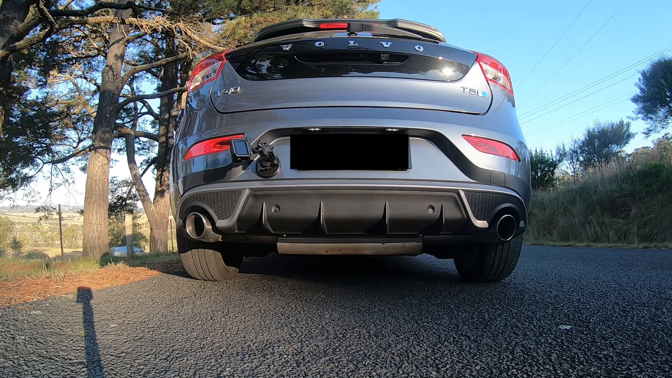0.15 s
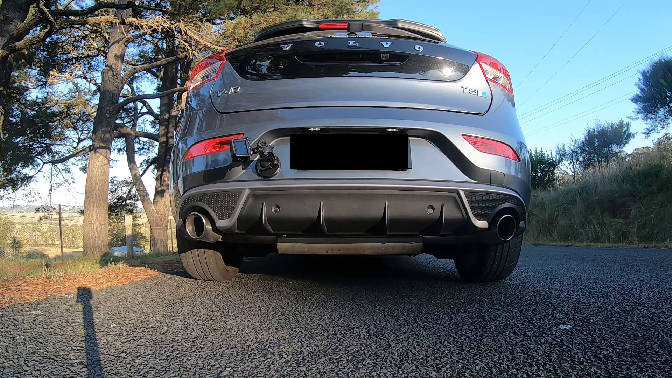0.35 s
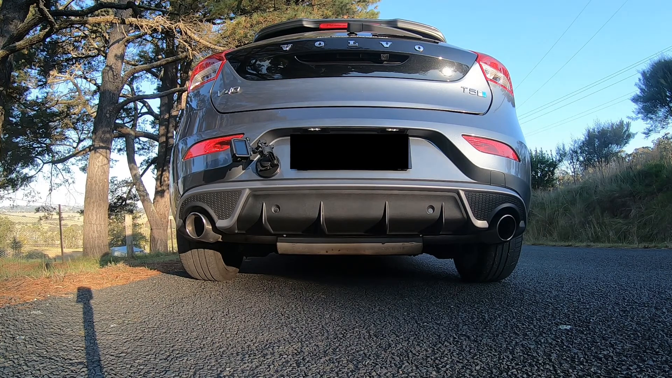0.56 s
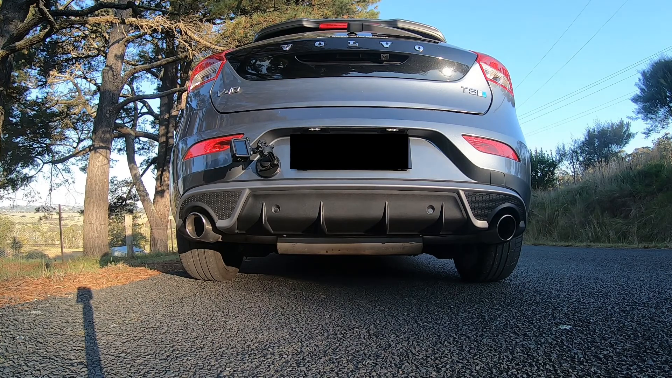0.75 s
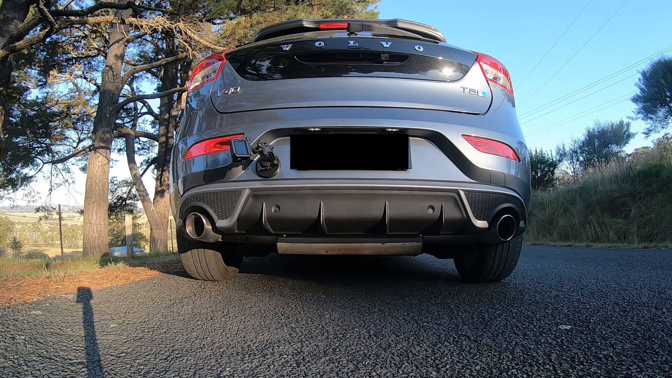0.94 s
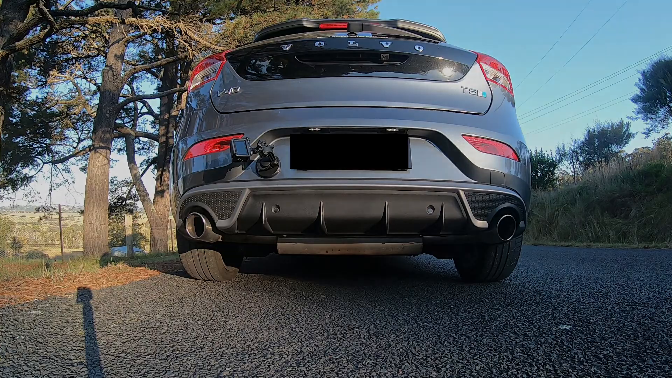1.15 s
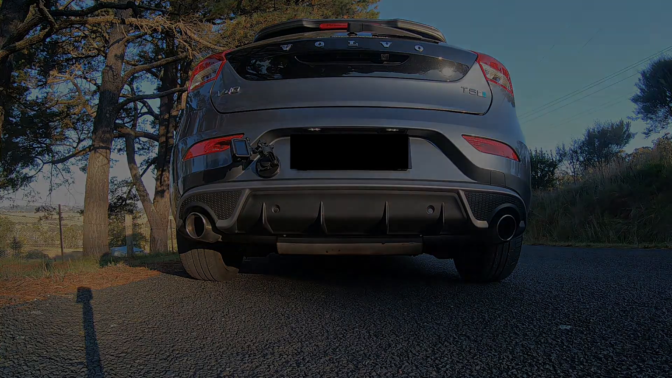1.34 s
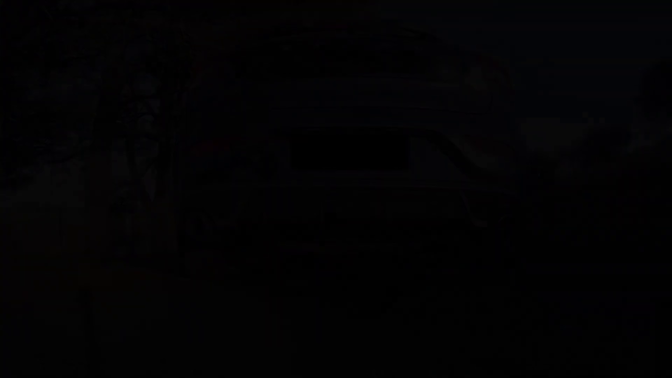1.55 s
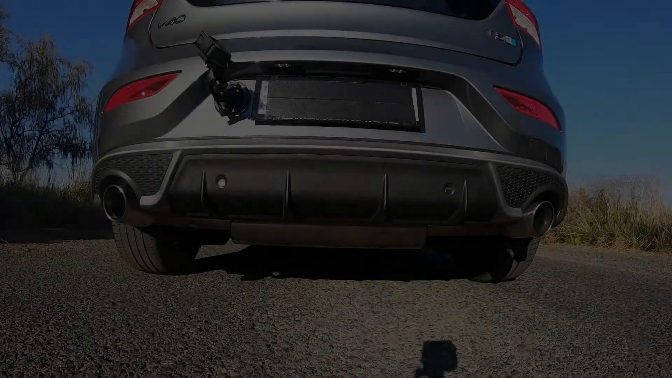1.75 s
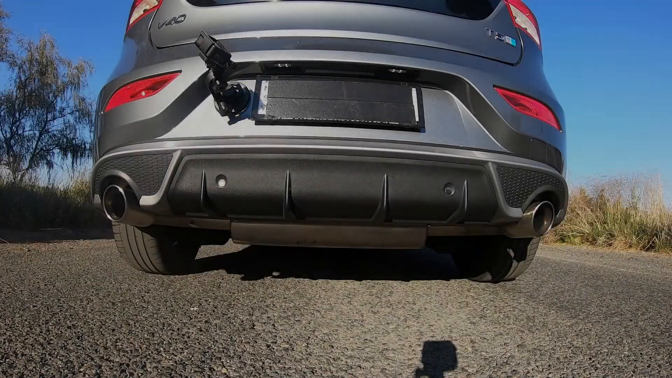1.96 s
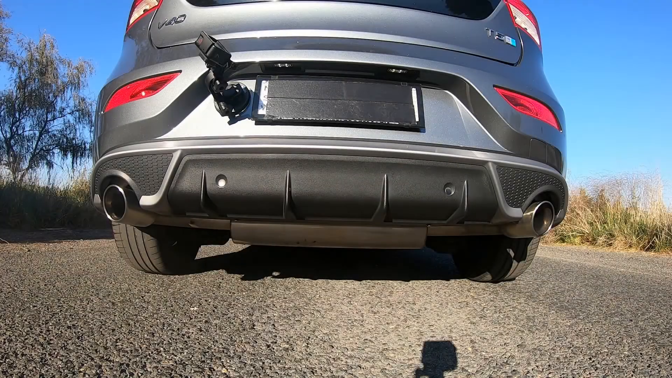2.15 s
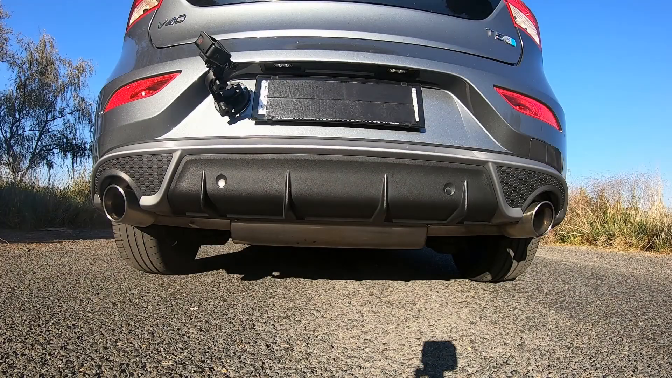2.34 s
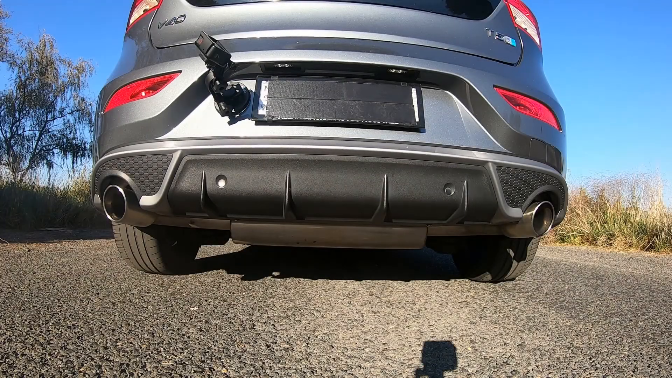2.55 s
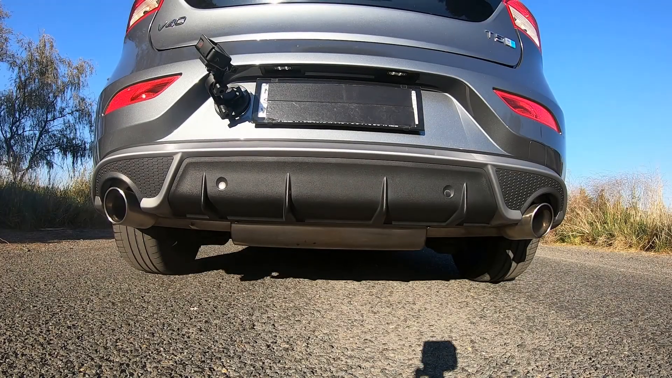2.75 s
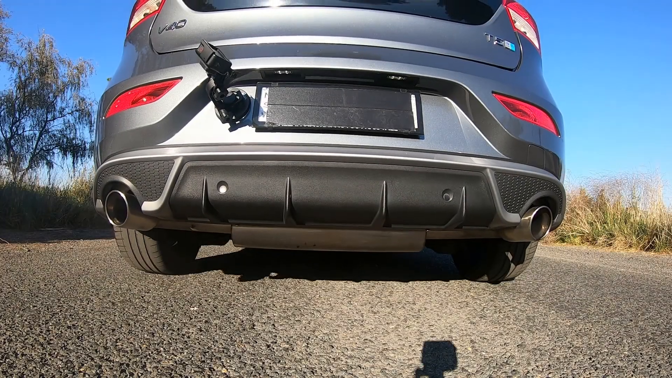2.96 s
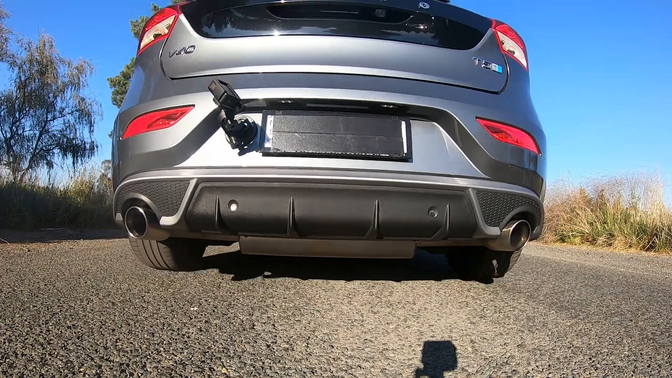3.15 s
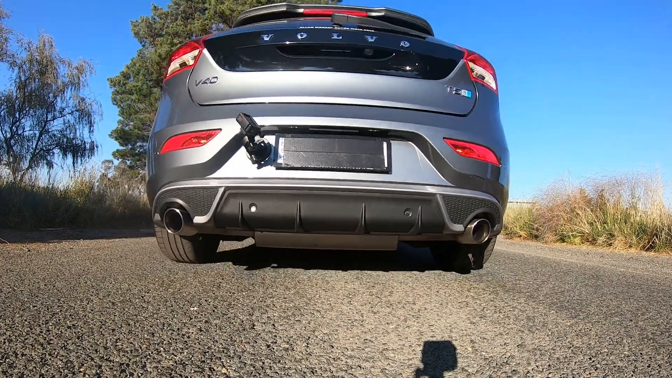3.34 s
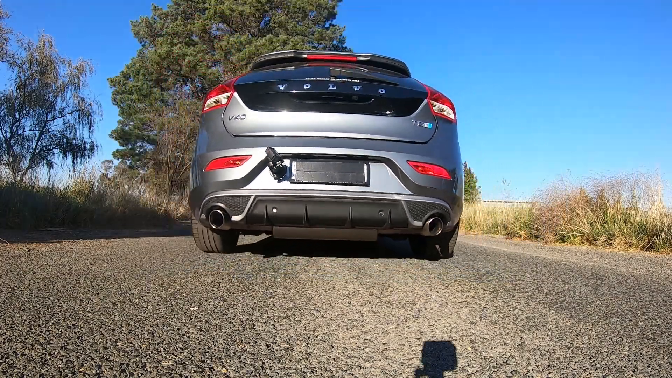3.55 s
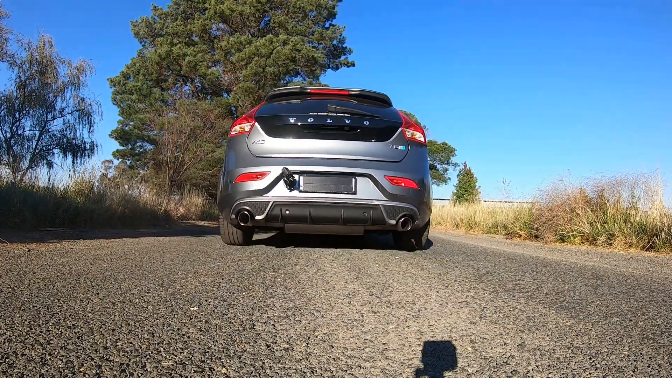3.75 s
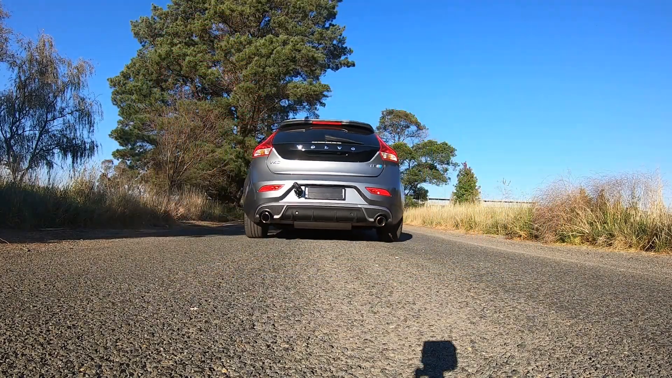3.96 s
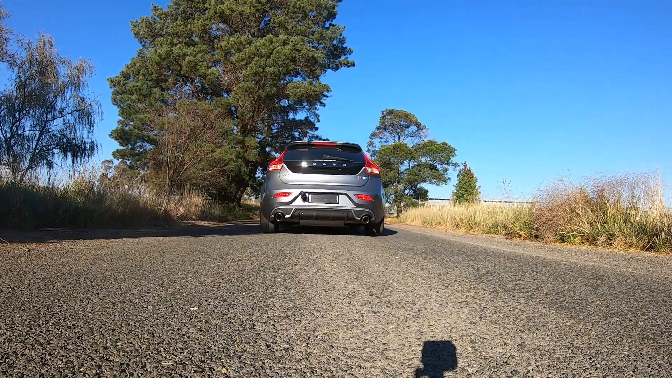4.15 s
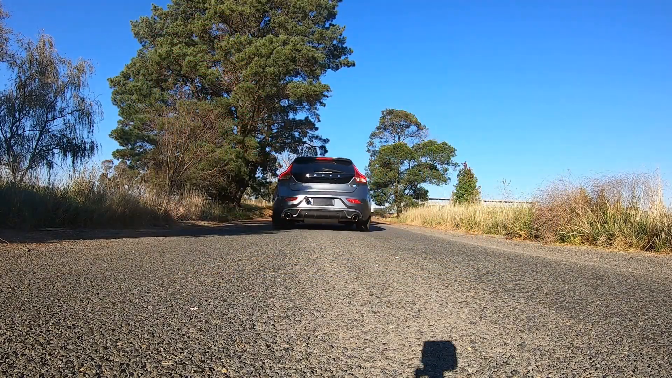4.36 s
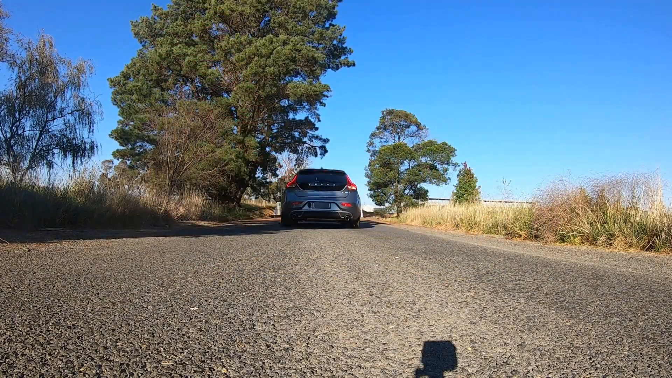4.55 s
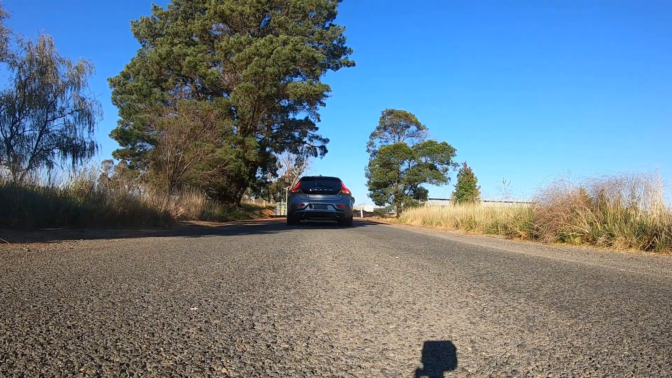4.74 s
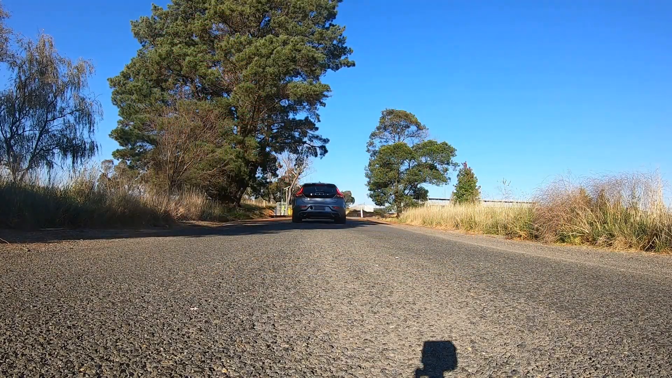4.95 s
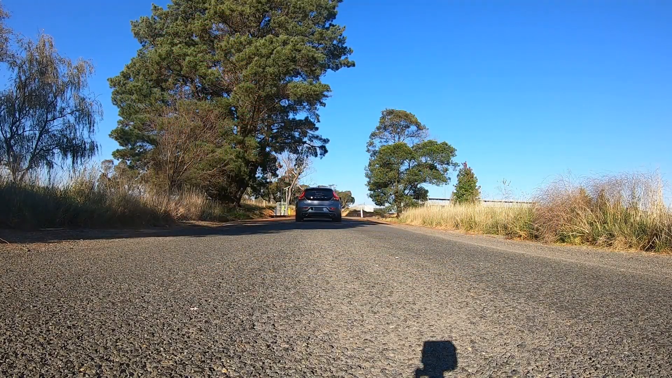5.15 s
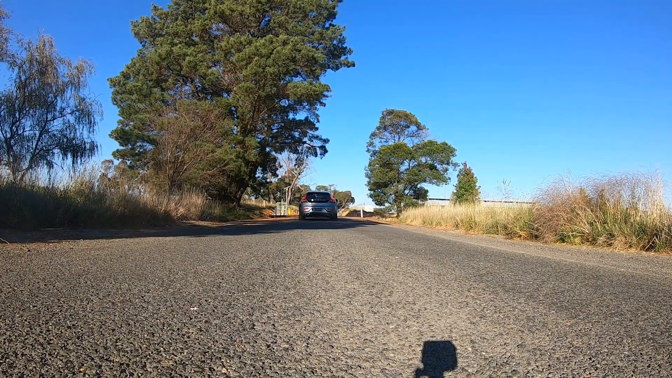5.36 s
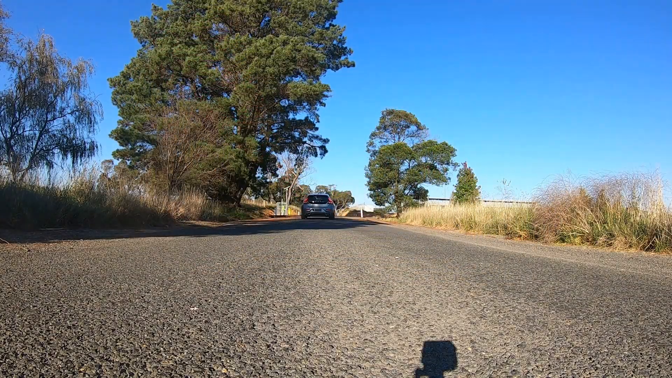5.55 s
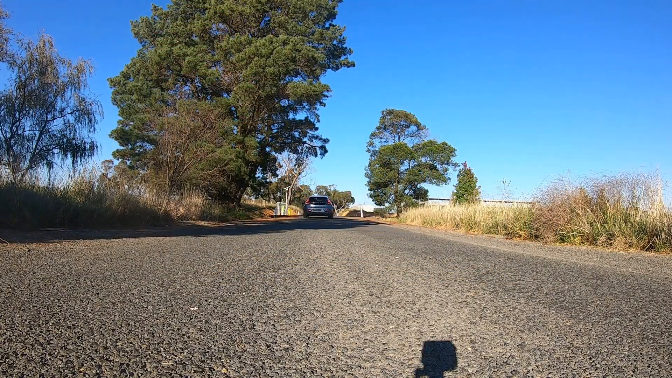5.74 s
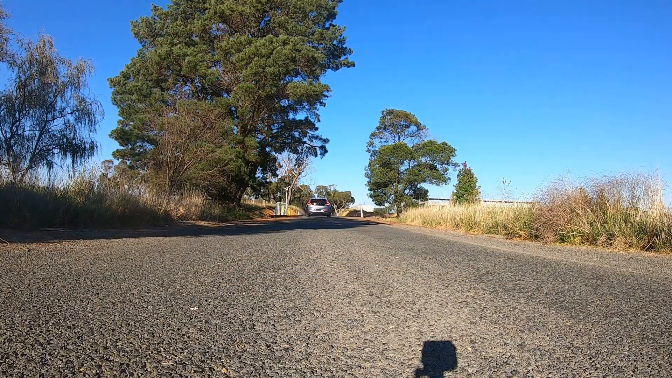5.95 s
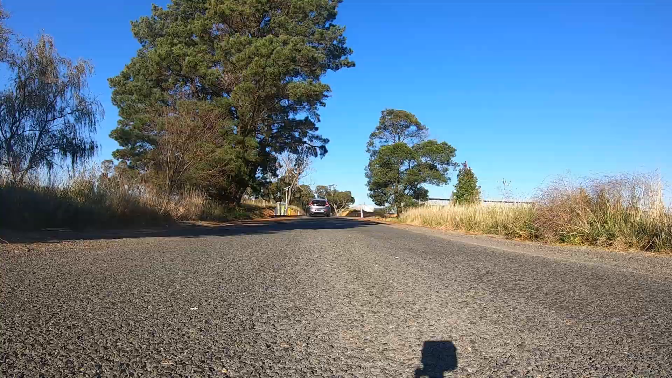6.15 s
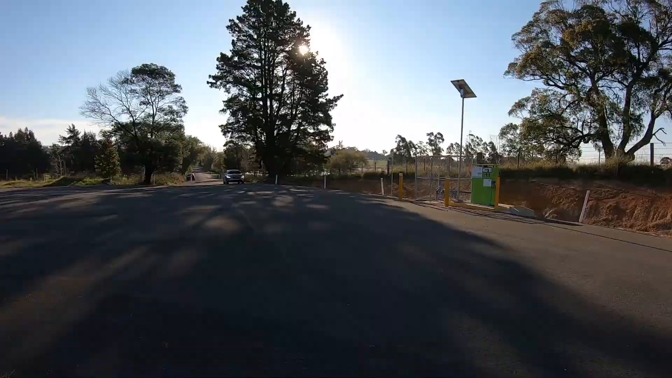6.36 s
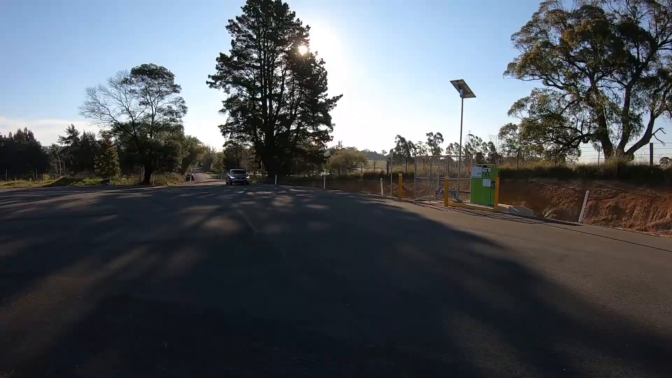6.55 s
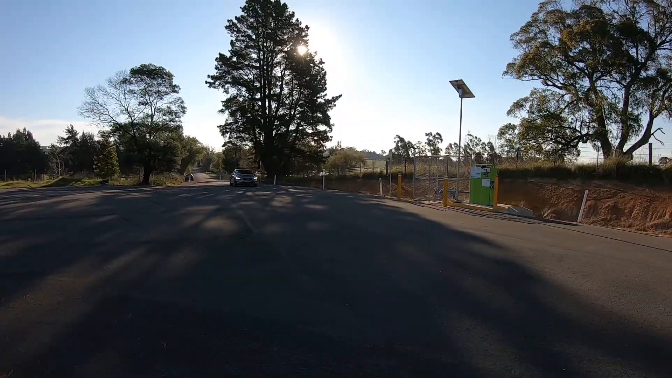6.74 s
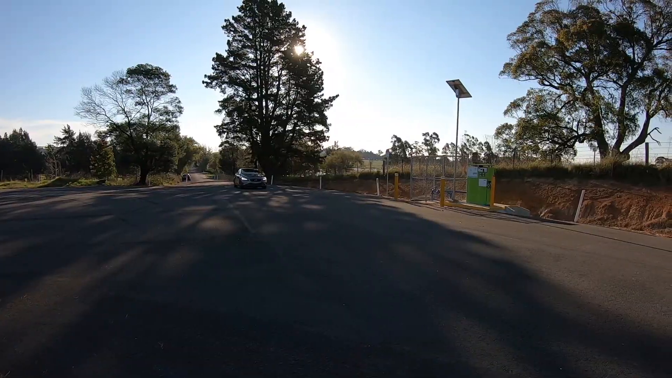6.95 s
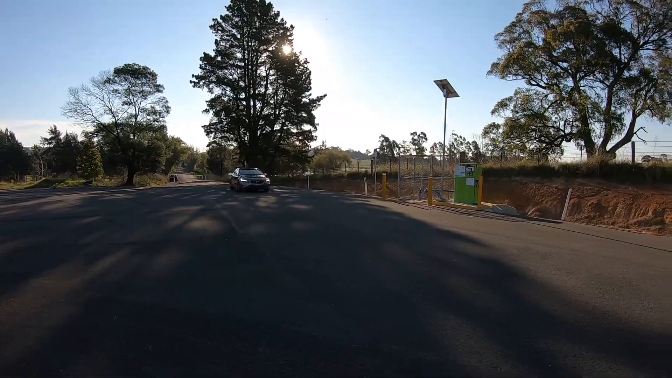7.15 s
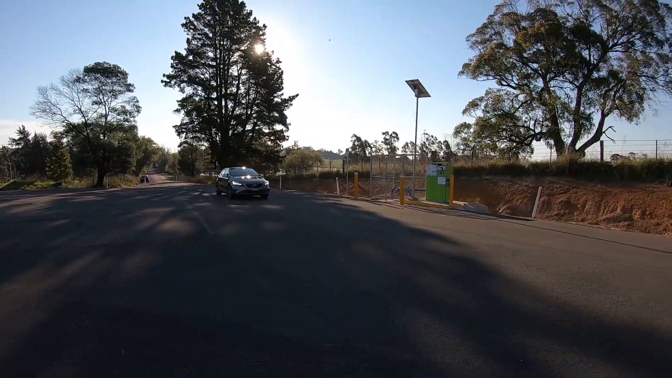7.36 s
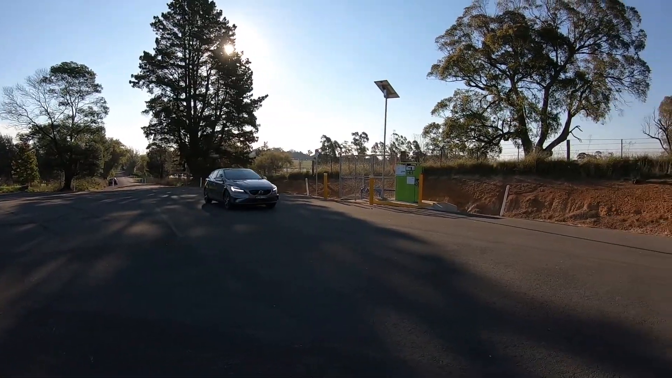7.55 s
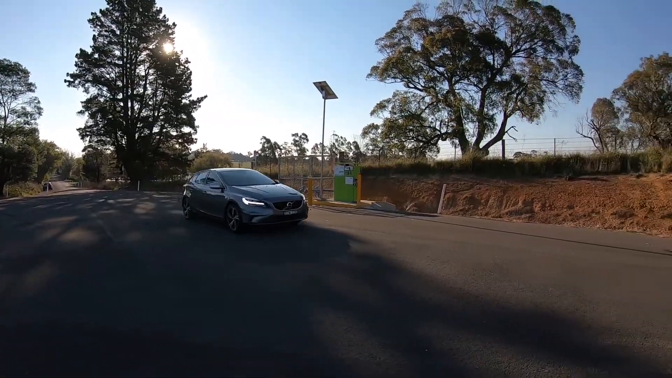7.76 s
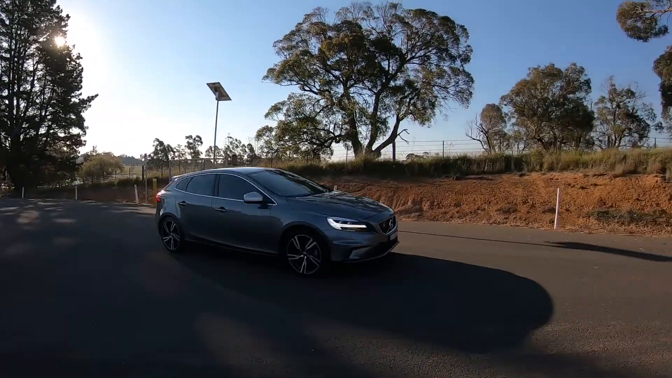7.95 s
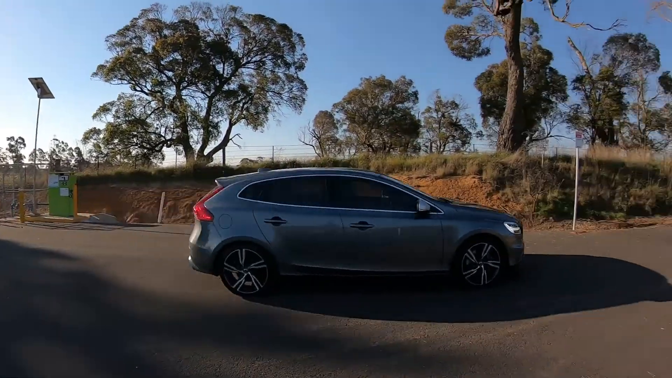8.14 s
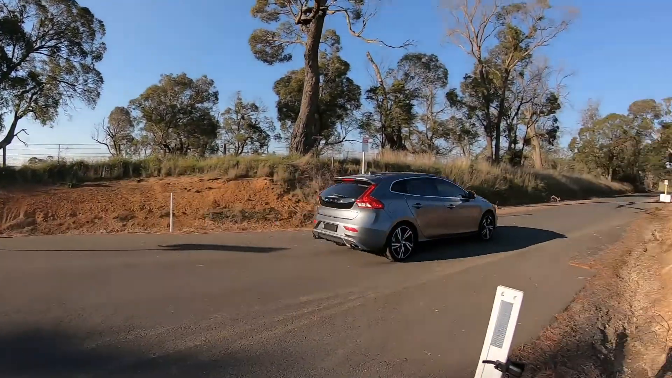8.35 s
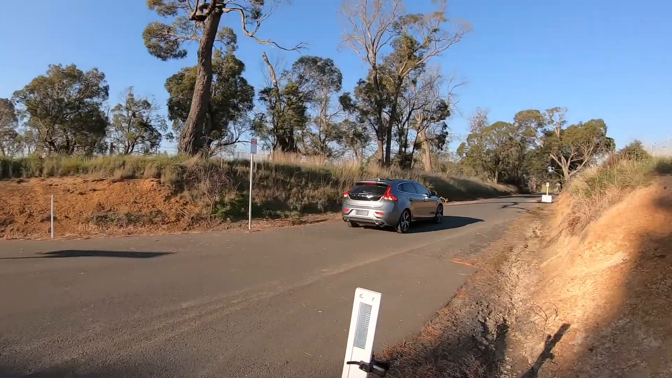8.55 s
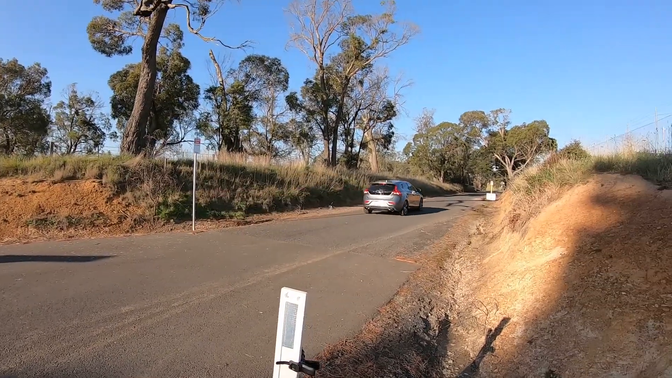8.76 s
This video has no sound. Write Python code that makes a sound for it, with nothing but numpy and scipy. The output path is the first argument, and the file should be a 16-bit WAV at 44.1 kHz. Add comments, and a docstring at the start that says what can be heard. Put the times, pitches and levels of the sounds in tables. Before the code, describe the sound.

A small car with a loud exhaust settles to a fading idle, launches hard over grit, burbles at a gear change, then roars past the roadside.

```python
"""A four-cylinder car with a loud exhaust, heard outdoors from changing places: the opening idle fades,
then comes the launch from behind over loose grit, burbling through a gear change, then the pass from
beside the road with tyre roar. The exhaust is a stack of tones locked to the firings. Gas, tyres and
rumble are shaped noise, grit is short noise bursts and ticks, and the idle whistles and soft swells
are noise in resonances. All but the ticks, whistles and swells differ between two microphone ports."""
import sys
import numpy as np
from scipy import signal
from scipy.io import wavfile
from scipy.ndimage import uniform_filter1d

SR = 44100
rng = np.random.default_rng(int(sys.argv[2]) if len(sys.argv) > 2 else 0)


def generate_wav(signal):
    """Clip the signal to [-1, 1] and save it as 16-bit WAV at the path in sys.argv[1]."""
    frames = np.transpose(np.atleast_2d(signal))
    scaled = np.clip(frames, -1, 1) * 32767
    pcm = np.round(scaled).astype(np.int16)
    wavfile.write(sys.argv[1], SR, pcm)


N = 388080  # length in samples
MOVE_S = 6.34  # the launch ends and the pass begins


def gain_of(db):
    """Turns decibels into a factor."""
    return 10 ** (np.asarray(db) / 20)


def evened(x):
    """Scales a signal to rms 1."""
    return x / np.sqrt(np.mean(x ** 2) + 1e-20)


def read(points, hz):
    """Reads a table of values over pitch at the given frequencies."""
    f, value = np.transpose(points)
    return np.interp(np.log(hz + 1), np.log(f + 1), value)


def follow(rows, t):
    """Reads every column of a table over time at the given times."""
    s, *columns = np.transpose(rows)
    return [np.interp(t, s, c) for c in columns]


def add(mix, s, sound):
    """Mixes a sound in, starting at s seconds."""
    part = mix[..., round(s * SR):][..., :sound.shape[-1]]
    part += sound[..., :part.shape[-1]]


def resonate(x, hz, width):
    """Rings at one pitch, fixed or moving: shift that pitch down to zero, smooth, shift back up."""
    turn = np.exp(2j * np.pi * np.cumsum(hz * np.ones(len(x))) / SR)
    r = np.exp(-np.pi * width / SR)
    return 2 * (turn * signal.lfilter([1 - r], [1, -r], x / turn)).real


# How far the throttle is open: the two times in seconds between which it goes from shut to open.
THROTTLE_OPENS = (2.47, 2.8)


def throttle(t):
    """Engine load, from 0 with the throttle shut to 1 with it open."""
    return np.interp(t, THROTTLE_OPENS, [0, 1])


# Engine speed as heard. Each row: time in seconds, firings per second.
FIRING_RATE = [(0, 56.5), (.2, 50.4), (.4, 43.7), (.55, 38), (.63, 38.5), (1.1, 34.1), (1.5, 32.4),
               (2.1, 31.6), (2.45, 31.7), (2.53, 34.3), (2.62, 41.5), (2.72, 51.8), (2.82, 59),
               (2.95, 65.2), (3.2, 71.9), (3.45, 75.1), (3.7, 80.2), (3.9, 87.6), (4.3, 107.4),
               (4.7, 140.1), (5, 158.5), (5.45, 180.1), (5.8, 197), (5.97, 200.6), (6.2, 148.7),
               (6.339, 146.5), (6.34, 153.3), (7, 171.4), (7.2, 178.8), (7.6, 190.8), (7.8, 198.6),
               (8.16, 205.2), (8.27, 204.8), (8.36, 199.2), (8.45, 196.5), (8.8, 196.8)]
# The burble while three cylinders are cut for the gear change. Each row: time in seconds, level in dB.
BURBLE_LEVEL = [(6.03, -48), (6.05, -20.5), (6.12, -18), (6.19, -16.5), (6.24, -32)]
SHIFT_START_S, SHIFT_END_S = BURBLE_LEVEL[0][0], BURBLE_LEVEL[-1][0]
# Spread of firing strength: steady part, part per firing rate in Hz, part added in the shift, and passing
ROUGH_IDLE, ROUGH_PER_HZ, ROUGH_SHIFT, ROUGH_PASS = 0.022, 0.00032, 0.89, 0.24


def exhaust(t, rows, mufflers, multiples, half_db):
    """Tones at multiples of the firing rate, shaped by the pipe; no two firings are equally strong."""
    hz, = follow(FIRING_RATE, t)
    level_db, extra_db = follow(rows, t)
    load = throttle(t)

    def pipe_db(f):
        return (1 - load) * read(mufflers[0], f) + load * read(mufflers[1], f)

    tone_db = [level_db + db + share * extra_db + pipe_db((k + 1) * hz)
               for k, (db, share) in enumerate(multiples)]

    # Misfires make the firings more uneven during the shift
    shifting = uniform_filter1d(1. * (t > SHIFT_START_S) * (t < SHIFT_END_S), size=3000)
    rough = np.where(t < MOVE_S, ROUGH_IDLE + ROUGH_PER_HZ * hz + ROUGH_SHIFT * shifting, ROUGH_PASS)

    turns = np.cumsum(hz) / SR  # firings so far
    strength = rng.standard_normal((int(turns[-1]) + 2, 3))
    low, high, slow = (np.interp(turns, np.arange(len(strength)), s) for s in strength.T)

    def wave(k, db):
        lag = np.pi / 4 * (1 - (k - 1) * (k - 2) / 2)  # the muffler holds the bass back
        return np.sqrt(2) * gain_of(db) * np.cos(2 * np.pi * k * turns - lag)

    lower = sum(wave(k + 1, db) for k, db in enumerate(tone_db[:2]))
    upper = sum(wave(k + 3, db) for k, db in enumerate(tone_db[2:]))
    # Every second firing is weaker, more or less so over time: tones half-way between the multiples
    halves = sum(wave(k + 1.5, np.maximum(tone_db[k], tone_db[k + 1]) + db)
                 for k, db in enumerate(half_db))
    wander = 1 + evened(uniform_filter1d(slow, size=6000)) / 2
    tones = (1 + rough * low) * lower + (1 + rough * high) * upper + wander * halves
    return tones, turns, hz


# Resonances of the pipe. Each row: pitch in Hz, width in Hz, relative level in dB.
PIPE_RESONANCES = [(46.5, 24, 24), (94, 50, -14), (150, 60, -29), (360, 50, -24)]


def burble(t, hz):
    """One cylinder in four still fires and thumps the pipe, which rings."""
    on = (t > SHIFT_START_S) & (t < SHIFT_END_S)
    cycles = np.cumsum(hz * on) / SR / 4 + 0.06
    thumps = -np.diff(np.floor(cycles), prepend=0)
    thumps = thumps * (1 + 0.17 * rng.standard_normal(len(t)))
    thumps = signal.oaconvolve(thumps, signal.windows.hann(90), "same")  # a blunt pressure pulse
    rung = sum(gain_of(db) * resonate(thumps, f, w) / w for f, w, db in PIPE_RESONANCES)
    level_db, = follow(BURBLE_LEVEL, t)
    return gain_of(level_db) * on * rung / np.sqrt(np.mean(rung[on] ** 2))


# How far the left port runs ahead of the right. Each row: pitch in Hz, phase in radians.
LEFT_LEAD = [(600, 0.17), (950, 0.84), (2000, 0.66), (3300, 0.33), (4300, 0.22)]


def noise(t, spectrum, ports, patchy_db, tilt_db=0):
    """Noise with a patchy random spectrum as the two ports hear it; tilt turns about 1.5 kHz."""
    frames, hz = len(t) // 256 + 5, np.fft.rfftfreq(1024, 1 / SR)
    a, b, c, d, patches = rng.standard_normal((frames, 513, 5)).T
    patches = uniform_filter1d(patches, size=9, axis=0)  # along pitch
    patches = evened(uniform_filter1d(patches, size=10, axis=1))  # along time

    same, balance_db, lead = (read(p, hz)[:, None] for p in (*ports, LEFT_LEAD))
    same = np.clip(same, 0, 1)
    left = a + 1j * b
    right = same * left + np.sqrt(1 - same ** 2) * (c + 1j * d)
    right = right * np.exp(-1j * lead)
    pair = np.array([left * gain_of(balance_db / 2), right / gain_of(balance_db / 2)])

    shape = gain_of(read(spectrum, hz)[:, None] + patchy_db * patches)
    shape = shape / np.sqrt(np.mean(shape ** 2))
    tilt_db = np.interp(np.arange(frames) * 256, np.arange(len(t)), tilt_db * np.ones(len(t)))
    octaves = np.log2(np.maximum(hz, 300) / 1500)[:, None]
    pair *= shape * gain_of(tilt_db * octaves)
    return signal.istft(pair, nperseg=1024, noverlap=768)[1][:, :len(t)] / 26


def hiss(t, calm, loaded, ports, patchy_db, tilt_db, turns, puff):
    """Rushing noise that blends from calm to loaded; gas leaves the pipe in puffs, one a firing."""
    load = throttle(t)
    shut = (1 - load) * noise(t, calm, ports, patchy_db, tilt_db)
    opened = load * noise(t, loaded, ports, patchy_db, tilt_db)
    puffs = evened(gain_of(puff * np.cos(2 * np.pi * turns)))
    return (shut + opened) * puffs


# Colour of the low rumble. Each row: pitch in Hz, relative level in dB per Hz.
RUMBLE_COLOUR = [(20, -33.5), (45, -16.5), (95, 6), (150, -2), (250, -3), (370, -6), (460, -9.5),
                 (800, -59)]


def rumble(t, ports, gain):
    """Deep noise that follows a given loudness."""
    return gain * noise(t, RUMBLE_COLOUR, ports, patchy_db=2.0)


def car(span, rows, mufflers, multiples, rush, calm, loaded, ports, half_db, puff, patchy_db):
    """Sums exhaust, burble, hiss and rumble over a span of time."""
    t = np.arange(*span, 1 / SR)
    tones, turns, hz = exhaust(t, rows, mufflers, multiples, half_db)
    if t[0] < SHIFT_START_S < t[-1]:
        tones = tones + burble(t, hz)
    hiss_db, tilt_db, rumble_gain, pan_db = rush(t)
    pan_db = np.outer([.5, -.5], pan_db - pan_db.mean())  # left up, right down
    rushing = hiss(t, calm, loaded, ports, patchy_db, tilt_db, turns, puff) * gain_of(hiss_db + pan_db)
    deep = rumble(t, ports, rumble_gain)
    fade = np.minimum(1, abs(t - MOVE_S) / .004)  # a short fade where launch and pass meet
    return (tones * gain_of([[-.4], [.4]]) + rushing + deep) * fade


# The rush before the pass. Each row: time in seconds, hiss in dB before the tilt,
# extra brightness in dB per octave.
RUSH_AWAY = [(0, -42.5, -0.5), (0.6, -48, -0.5), (1.9, -47.5, 0.5), (2.45, -43, 1), (2.65, -37, 1.5),
             (3.4, -33.5, 0.9), (4.1, -34.5, 1), (4.65, -30, -0.5), (5.6, -31.5, -0.6), (6.34, -32.5, -1.3)]
RUMBLE_OVER_HISS_DB, PAN_DRIFT_DB_PER_S = 5, 0.4


def rush_behind(t):
    """Hiss, brightness, rumble and pan up to the pass; the rumble keeps step with the hiss."""
    hiss_db, tilt_db = follow(RUSH_AWAY, t)
    return hiss_db, tilt_db, gain_of(hiss_db + RUMBLE_OVER_HISS_DB), PAN_DRIFT_DB_PER_S * t


# Exhaust at idle and launch. Each row: time in seconds, level in dB before the tables below,
# extra dB for the favoured multiples.
LAUNCH_LEVEL = [(0, -21, -1.5), (0.55, -20.5, -7), (0.63, -29.5, -5), (1.1, -28.5, -2), (1.35, -33.5, -2),
                (1.5, -32, -0.5), (2.1, -49, 13), (2.45, -47.5, 11.5), (2.53, -41, 9), (2.62, -26.5, 0.5),
                (2.72, -30, 0.7), (3.2, -28, 1), (3.7, -29.5, 3.5), (4.4, -22, -0.2), (4.7, -24.5, 6),
                (5, -22.5, 3.3), (5.45, -24, 1.7), (5.97, -20, -5.5), (6.2, -39, 10)]
# How the pipe passes each pitch, throttle shut and then open. Each row: pitch in Hz, gain in dB.
PIPE_SHUT = [(30, 11.5), (45, 15.5), (65, 9.5), (90, 8.5), (120, -2), (160, -2), (200, -10.5), (280, -17),
             (450, -24)]
PIPE_OPEN = [(35, 14), (65, 15.3), (90, 10.5), (115, 1.5), (145, 6.3), (170, -3.3), (195, -8.5), (230, -5),
             (280, -6.5), (320, -8), (365, -2.5), (420, -17), (520, -27), (900, -21)]
# The 1st to 8th multiple of the firing rate. Each row: level in dB, share of the extra dB.
TONES_BEHIND = [(0.5, 0.5), (0.5, 1.5), (-2.5, 1), (-5, 2), (-7, 1.5), (-14, 1.5), (-11.5, 2), (-13, 2)]
# Gas hiss at idle, then exhaust and road under load. Each row: pitch in Hz, relative level in dB per Hz.
IDLE_COLOUR = [(180, -32), (300, -19), (343, -9), (399, -21), (500, -4), (749, -9), (871, -5.5),
               (1030, -10.5), (1590, -8), (2420, -15), (3310, -15.5), (4210, -22), (6220, -31), (8140, -27),
               (10800, -41.5), (14100, -75.5), (22000, -120)]
LOAD_COLOUR = [(260, -29.5), (450, -9), (542, -9), (746, -8), (808, -12.5), (936, -7.5), (1610, -15.5),
               (1770, -13), (2000, -19), (2280, -16.5), (3450, -19.5), (4270, -25.5), (6110, -35.5),
               (7870, -34), (10800, -48), (14100, -85.5), (22000, -120)]
# The two ports, as two lists. Each row: pitch in Hz, likeness (1 is equal); then pitch in Hz, left over
# right in dB.
PORTS_BEHIND = [(60, 0.5), (220, 0.83), (790, 0.9), (2860, 0.87), (10400, 0.1)], [(60, -9.5), (140, -3),
                (330, -0.5), (790, -6), (1860, -3.5), (4400, -1.5), (10400, 1)]


def idle_and_launch():
    """The opening idle fades, then the car pulls away as the throttle opens, with strong gas puffs."""
    return car((0, MOVE_S), LAUNCH_LEVEL, (PIPE_SHUT, PIPE_OPEN), TONES_BEHIND, rush_behind,
               IDLE_COLOUR, LOAD_COLOUR, PORTS_BEHIND,
               half_db=(-27, -29, -20, -17, -13.5), puff=0.87, patchy_db=1.26)


# The pass: a straight line at steady speed
CLOSEST_S, CLOSEST_M, SPEED_M_PER_S = 8.045, 4.03, 13.1
ROAR_DB = -13.5  # at the closest point, before the tilt
# Brightness in dB per octave: far off, added when near, added from the rear
BRIGHT_FAR_DB, BRIGHT_NEAR_DB, BRIGHT_REAR_DB = -2.5, 4.5, -1
RUMBLE_FRONT_DB, RUMBLE_REAR_DB = -9., 0.5  # against the roar
RUMBLE_FLOOR_DB, PAN_SWING_DB = -31., -4


def rush_beside(t):
    """The same from distance and bearing: bright when near, duller and deeper once the rear shows."""
    along = SPEED_M_PER_S * (t - CLOSEST_S)
    near = CLOSEST_M / np.hypot(along, CLOSEST_M)
    bearing = along * near / CLOSEST_M  # towards -1 approaching, towards 1 leaving
    rear = (1 + bearing) / 2
    hiss_db = ROAR_DB + 20 * np.log10(near)
    tilt_db = BRIGHT_FAR_DB + BRIGHT_NEAR_DB * near + BRIGHT_REAR_DB * rear ** 2
    rumble_db = hiss_db + RUMBLE_FRONT_DB + (RUMBLE_REAR_DB - RUMBLE_FRONT_DB) * rear
    rumble_gain = np.sqrt(gain_of(rumble_db) ** 2 + gain_of(RUMBLE_FLOOR_DB) ** 2)
    return hiss_db, tilt_db, rumble_gain, PAN_SWING_DB * bearing


# Exhaust from beside. Each row: time in seconds, level in dB before the two tables below,
# extra dB for the favoured multiples.
PASS_LEVEL = [(6.34, -38.5, 6.5), (6.8, -27, 8.5), (7.2, -24, -0.7), (7.55, -25, -8.5), (7.8, -22.5, -8),
              (7.95, -20, -11.5), (8.1, -22.0, 0), (8.17, -22.5, -4.5), (8.272, -27.5, 3),
              (8.36, -22, -5.5), (8.41, -25.5, 9), (8.56, -26.7, 10), (8.65, -24.5, -5.5),
              (8.8, -24.5, -1.5)]
# How the pipe passes each pitch, heard from beside. Each row: pitch in Hz, gain in dB.
PIPE_BESIDE = [(150, 13), (180, -6.5), (205, 3), (330, -19.5), (400, -6), (480, -10.5), (600, -1.5),
               (700, 0), (820, -6), (960, 14), (1080, -12), (1220, 3.5), (1400, 8), (1650, 18)]
# The 1st to 8th multiple of the firing rate. Each row: level in dB, share of the extra dB.
TONES_BESIDE = [(-1, -0.082), (6, 1), (-8, -0.48), (-13, -0.54), (-17.5, -0.023), (-19.5, -0.69),
                (-23, -0.59), (-30, 0)]
# Tyres passing. Each row: pitch in Hz, relative level in dB per Hz.
TYRE_COLOUR = [(260, -16), (450, -8.5), (514, -5), (595, -4), (841, -6.5), (987, -3.5), (1320, -6.5),
               (2220, -9.5), (3990, -15.5), (4380, -21), (9740, -32.5), (10800, -43), (12000, -54),
               (14100, -58), (15000, -95), (22000, -120)]
# The two ports, as two lists. Each row: pitch in Hz, likeness (1 is equal); then pitch in Hz, left over
# right in dB.
PORTS_BESIDE = [(60, 1), (220, 0.99), (790, 1), (2860, 0.97), (10400, 0.23)], [(60, -0.5), (140, -0.5),
                (330, -2.5), (790, -6.5), (1860, -1.5), (4400, 0), (10400, 0.5)]


def drive_past():
    """The car from beside the road: tyre roar swells and fades with distance, along with the exhaust."""
    return car((MOVE_S, N / SR), PASS_LEVEL, (PIPE_BESIDE, PIPE_BESIDE), TONES_BESIDE, rush_beside,
               TYRE_COLOUR, TYRE_COLOUR, PORTS_BESIDE,
               half_db=(-29, -22, -3, -12, -2.5), puff=0.15, patchy_db=1.4)


# Grit thrown by the tyres. Each row: start in seconds, peak in dB, main pitch in Hz.
GRIT_HITS = [(3.3606, -20, 1230), (3.3787, -21, 1110), (3.435, -16.5, 2040), (3.451, -15, 1200),
             (3.4626, -24, 1300), (3.552, -17, 1100), (3.5656, -23, 2200), (3.6485, -25, 1500),
             (3.723, -22, 1300), (3.7288, -18, 2830), (4.695, -20.5, 2250), (8.3683, -9, 1690)]


def grit():
    """Short noise bursts around a pitch, and faint ticks, thickest while the tyres bite."""
    out, t = np.zeros((2, N)), np.arange(2000) / SR
    for (s, db, hz), z in zip(GRIT_HITS, rng.standard_normal((len(GRIT_HITS), 2, len(t)))):
        decay = np.exp(-t / 0.0034) + 0.23 * np.exp(-t / 0.023)
        z = (z[0] + 0.91 * z) * decay * np.minimum(1, t / 0.0011)  # the sides share some noise
        burst = np.array([resonate(resonate(resonate(c, hz, 1800), hz, 2600), 2000, 3500) for c in z])
        add(out, s, gain_of(db) * burst / abs(burst).max())

    time = np.arange(N) / SR
    ticks_per_s = np.interp(time, [2.6, 3.3, 3.8, 5.0, 6.3], [-12, 116, 118, 37, 6])  # below 0: none
    size = gain_of(-53.5 + 4.4 * np.minimum(rng.exponential(1, N), 4))
    size = size * (rng.random(N) < ticks_per_s / SR)
    tick = np.sin(2 * np.pi * 2800 * t[:300]) * (t[:300] / 0.00063) * np.exp(-t[:300] / 0.0002)
    return out + signal.oaconvolve(size, tick)[:N]


# Faint whistles, one list for each. Each row: time in seconds, pitch in Hz, level in dB.
WHISTLES = [
    [(.45, 1970, -61), (.75, 1926, -59.5), (1.15, 1790, -66)],
    [(1.85, 3300, -61.5), (2.45, 3310, -65)],
    [(2.0, 1860, -60.5), (2.5, 1880, -57), (2.62, 2000, -57)],
    [(1.85, 1700, -57), (2.3, 1686, -62)],
    [(.45, 341.6, -58.5), (1.5, 336, -55.5), (2.3, 338, -58)],
]


def whines():
    """Faint whistles from the idling engine: noise through two narrow resonances that glide."""
    out = np.zeros(N)
    for rows in WHISTLES:
        t = np.arange(rows[0][0], rows[-1][0], 1 / SR)
        hz, db = follow(rows, t)
        width = hz[0] / 75
        whistle = evened(resonate(resonate(rng.standard_normal(len(t)), hz, width), hz, width))
        add(out, t[0], gain_of(db) * whistle * signal.windows.tukey(len(t), .2))
    return out


# Brief fuzzy swells in the rush. Each row: middle in seconds, level at the middle in dB,
# half length in seconds, pitch in Hz, width in Hz.
SOFT_SWELLS = [(.17, -54, .15, 940, 201), (2.97, -25, .08, 102, 40), (3.55, -22, .2, 110, 40.3),
               (4.6, -29, .3, 377, 70), (5.75, -30, .06, 35, 25), (8.12, -17, .07, 107, 50),
               (8.32, -18, .06, 114, 60), (8.7, -21, .06, 960, 450)]


def swells():
    """Noise through two equal soft resonances, rising and falling in a bell shape."""
    out = np.zeros(N)
    for (s, db, half, hz, width), z in zip(SOFT_SWELLS, rng.standard_normal((len(SOFT_SWELLS), 2 * SR))):
        t = np.arange(max(-2 * half, -s), 2 * half, 1 / SR)
        fuzz = evened(resonate(resonate(z[:len(t)], hz, width), hz, width))
        add(out, s + t[0], gain_of(db) * np.exp(-(t / half) ** 2) * fuzz)
    return out


def scene():
    """The idle and launch, then the pass, with grit, whistles and swells mixed in."""
    mix = grit() + whines() + swells()
    add(mix, 0, idle_and_launch())
    add(mix, MOVE_S, drive_past())
    return mix


EDGE_HZ = 14900


def record(dry):
    """The recorder's band limit: a steep filter removes what lies above the edge."""
    low_pass = signal.firwin(511, EDGE_HZ, window=("kaiser", 9), fs=SR)
    return signal.oaconvolve(dry, low_pass[None], "same")


dry = scene()
out = record(dry)
generate_wav(out)
```